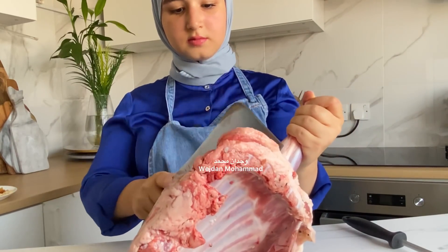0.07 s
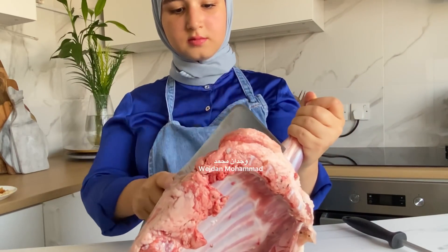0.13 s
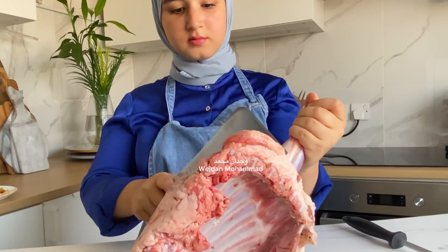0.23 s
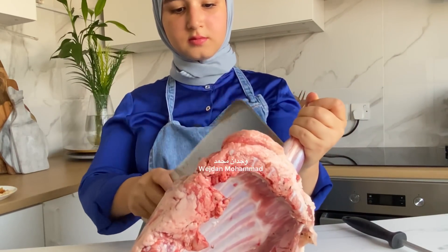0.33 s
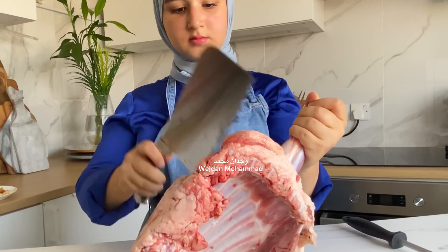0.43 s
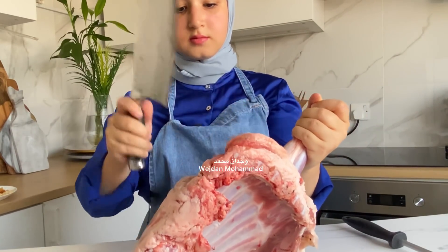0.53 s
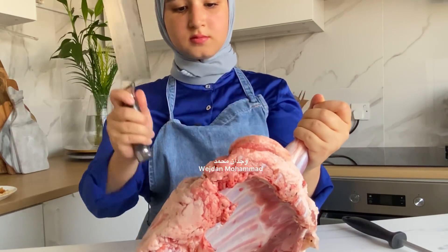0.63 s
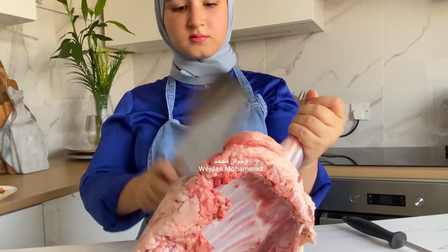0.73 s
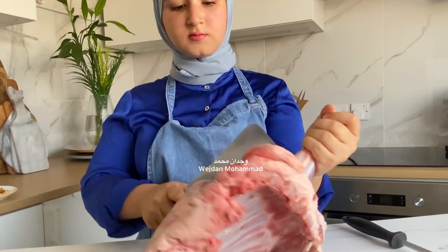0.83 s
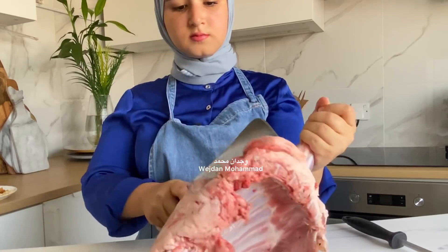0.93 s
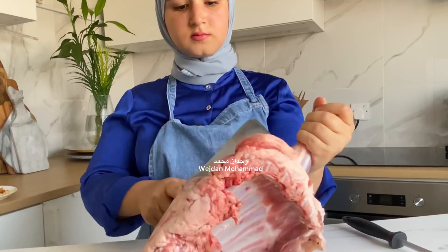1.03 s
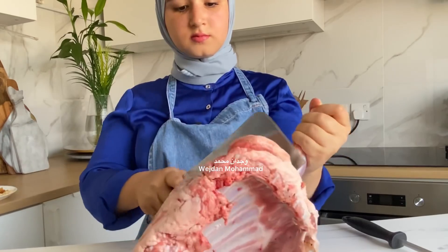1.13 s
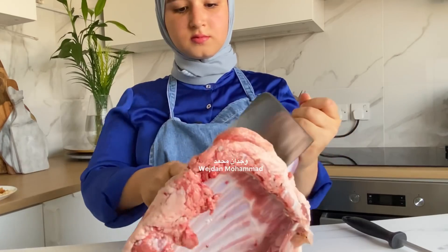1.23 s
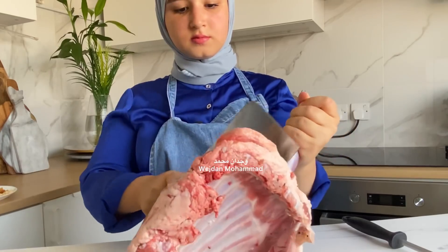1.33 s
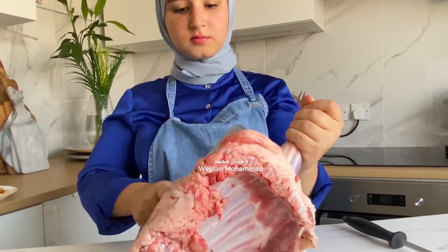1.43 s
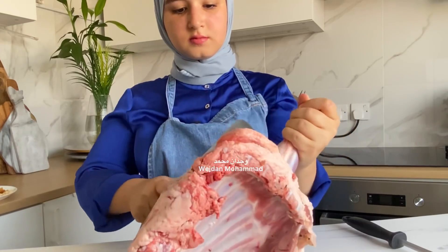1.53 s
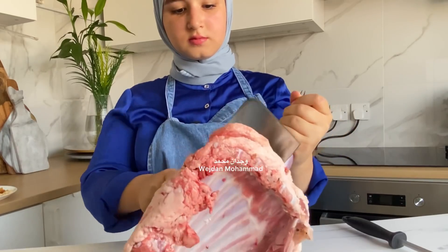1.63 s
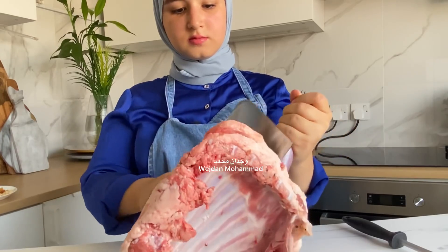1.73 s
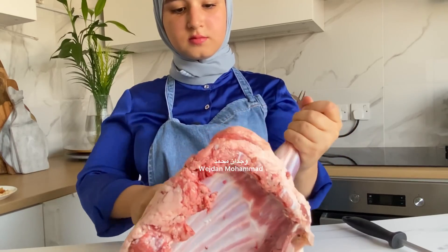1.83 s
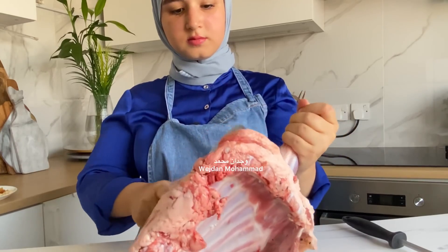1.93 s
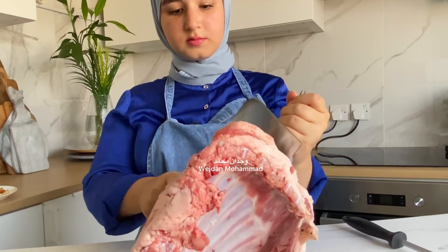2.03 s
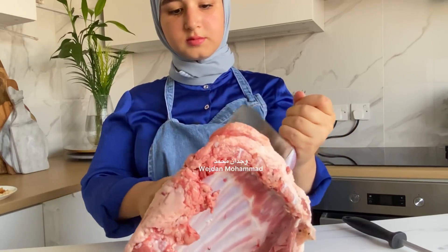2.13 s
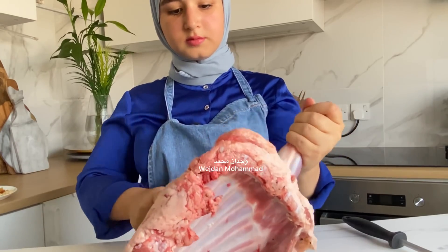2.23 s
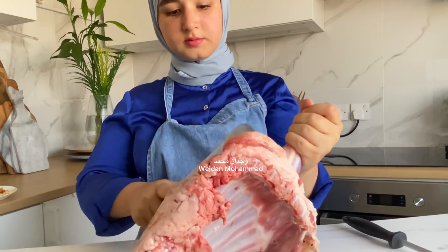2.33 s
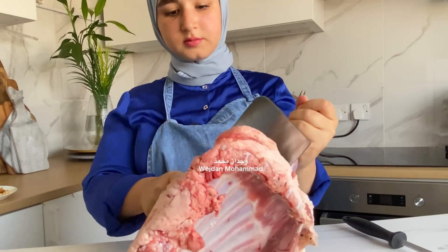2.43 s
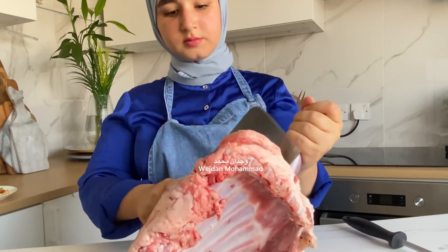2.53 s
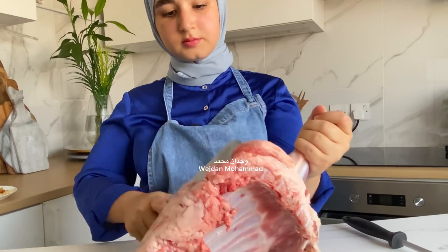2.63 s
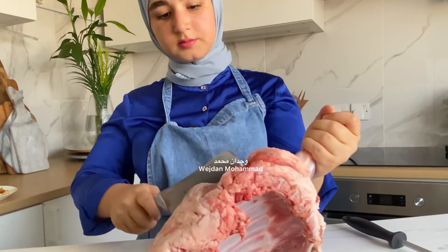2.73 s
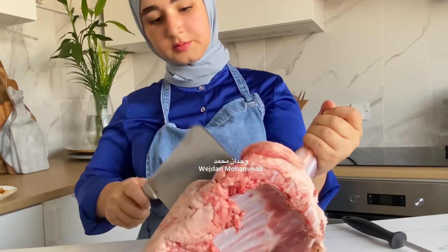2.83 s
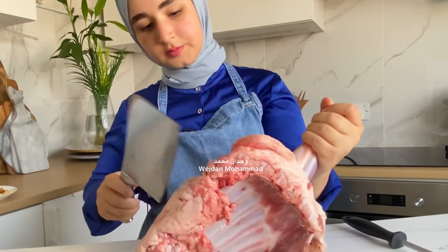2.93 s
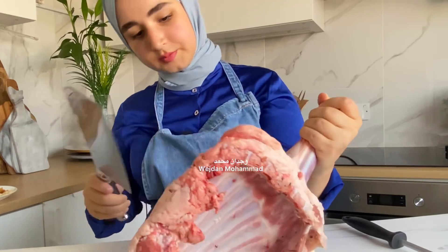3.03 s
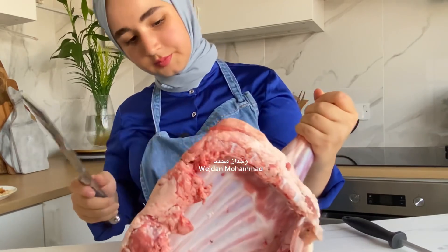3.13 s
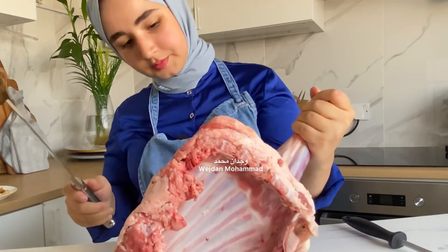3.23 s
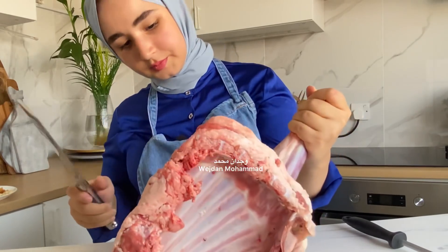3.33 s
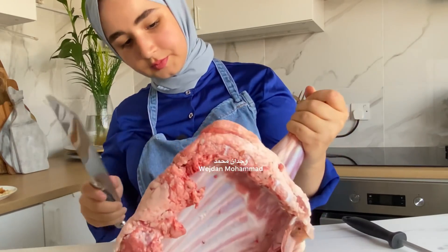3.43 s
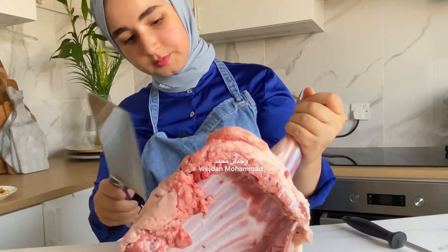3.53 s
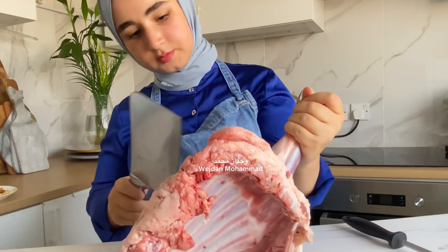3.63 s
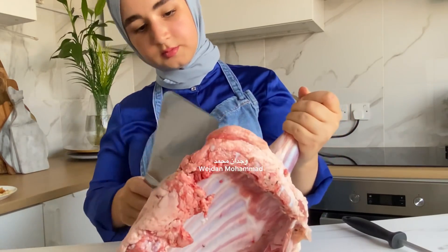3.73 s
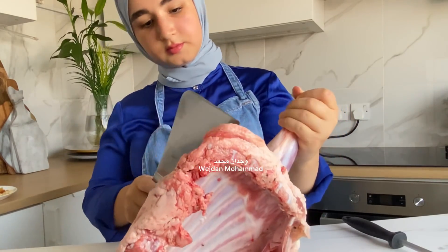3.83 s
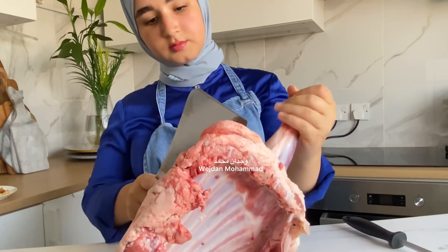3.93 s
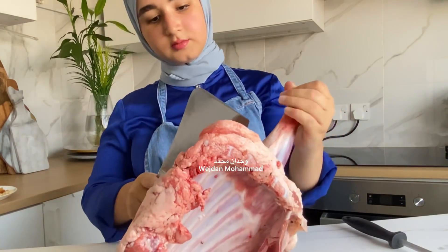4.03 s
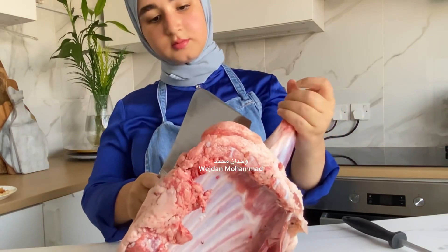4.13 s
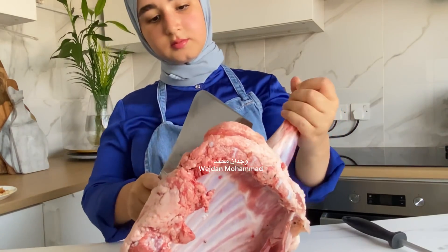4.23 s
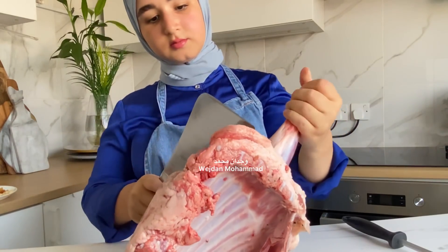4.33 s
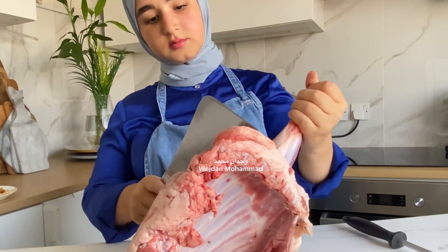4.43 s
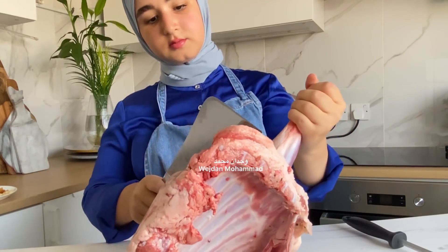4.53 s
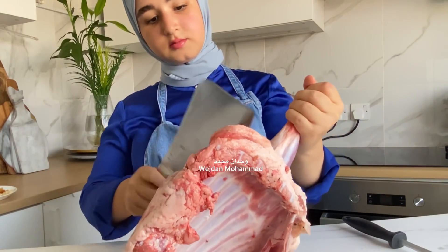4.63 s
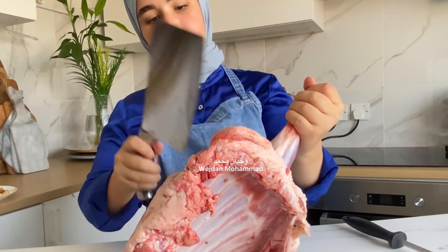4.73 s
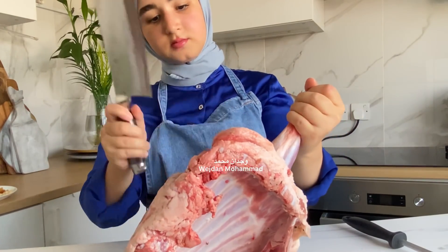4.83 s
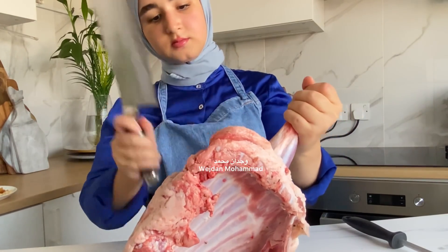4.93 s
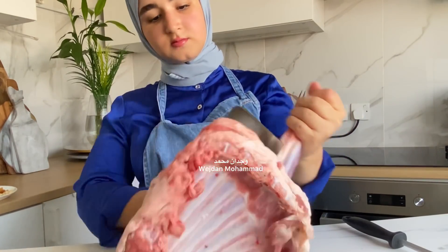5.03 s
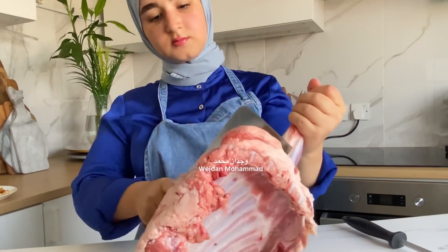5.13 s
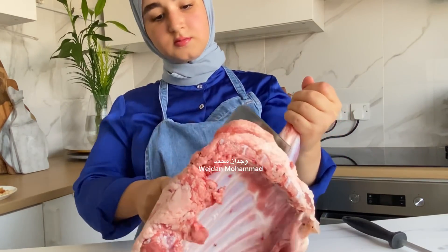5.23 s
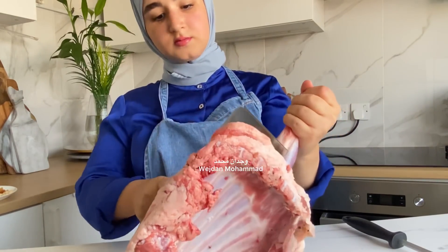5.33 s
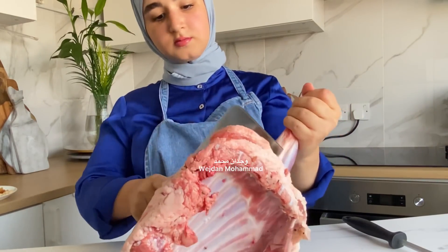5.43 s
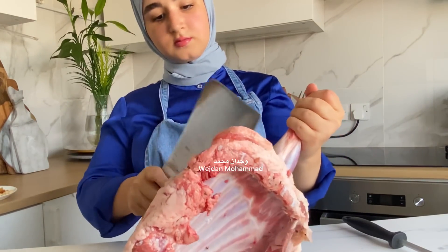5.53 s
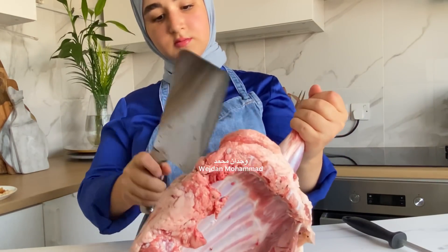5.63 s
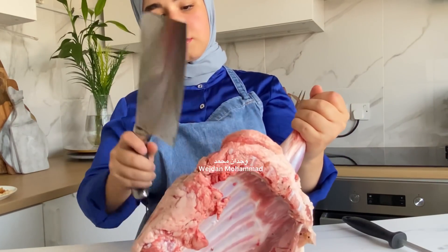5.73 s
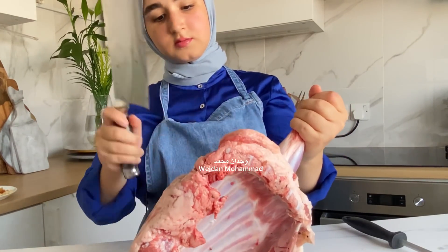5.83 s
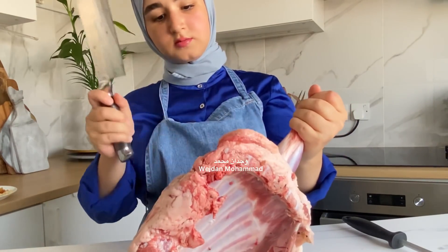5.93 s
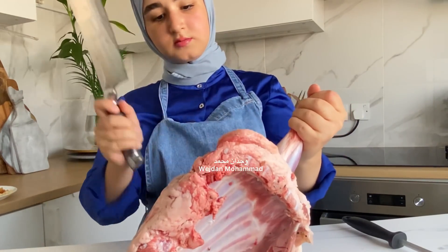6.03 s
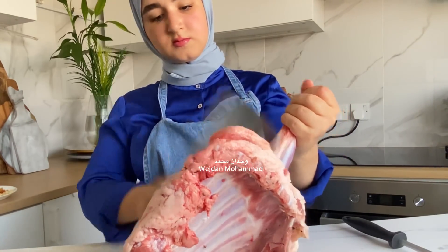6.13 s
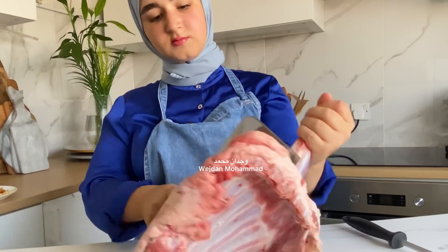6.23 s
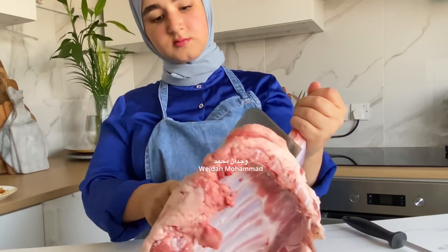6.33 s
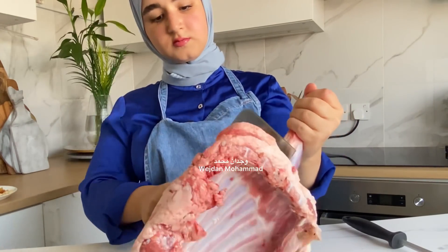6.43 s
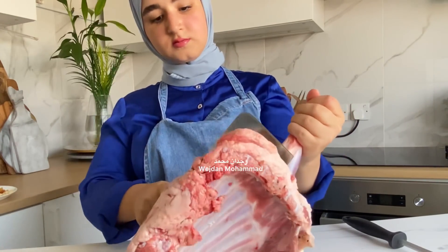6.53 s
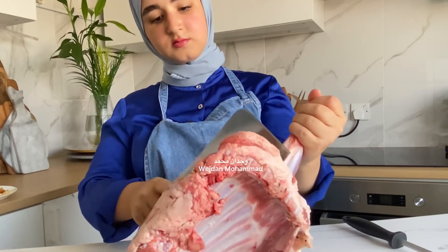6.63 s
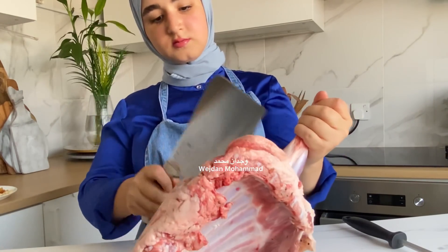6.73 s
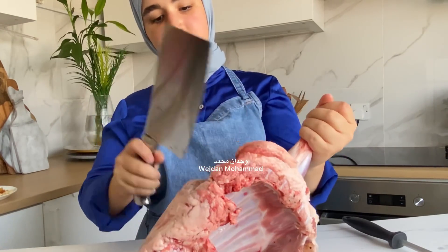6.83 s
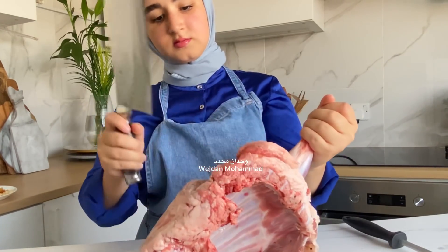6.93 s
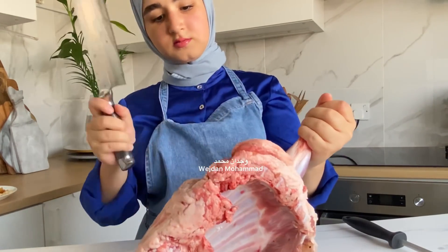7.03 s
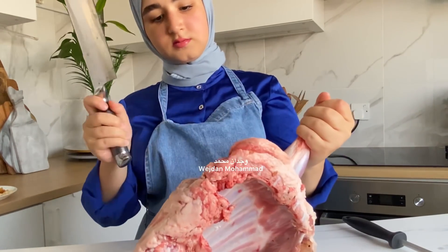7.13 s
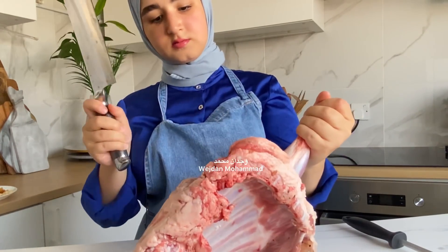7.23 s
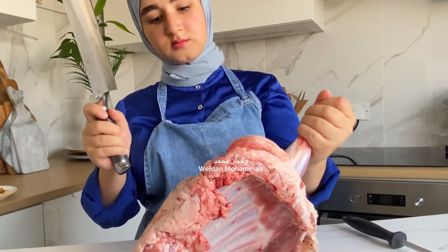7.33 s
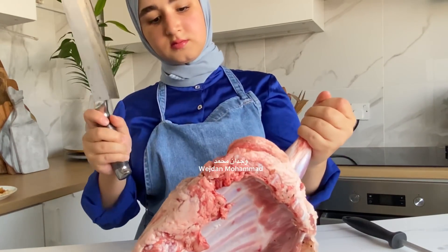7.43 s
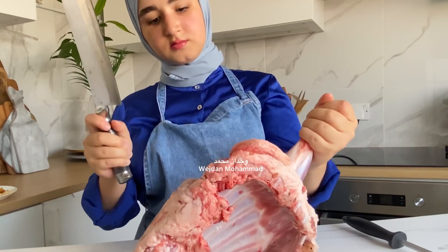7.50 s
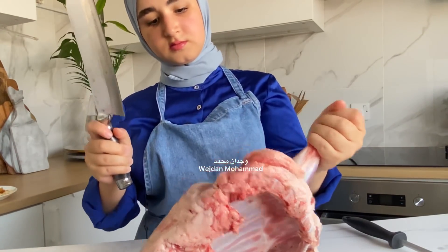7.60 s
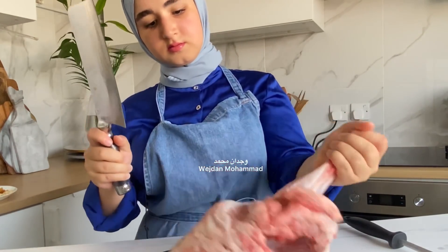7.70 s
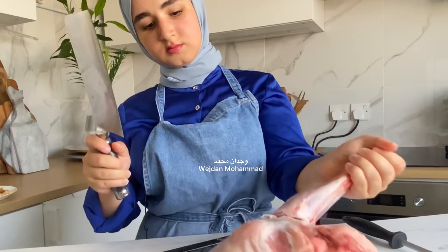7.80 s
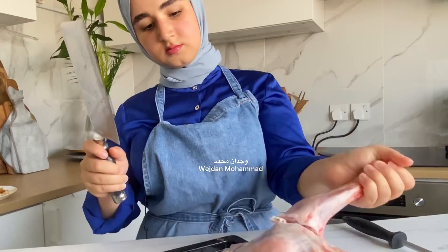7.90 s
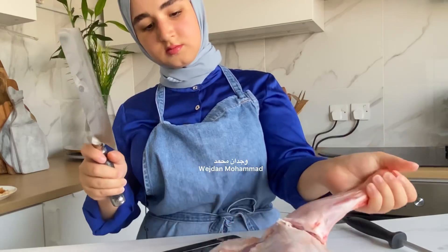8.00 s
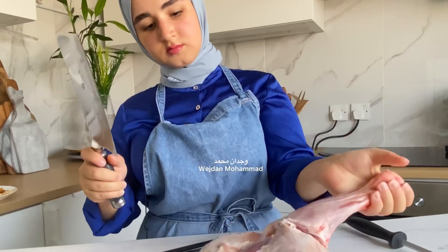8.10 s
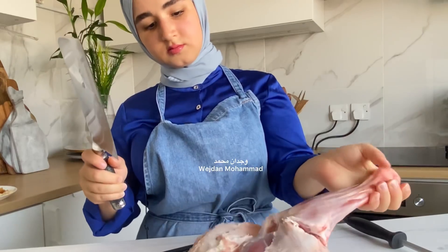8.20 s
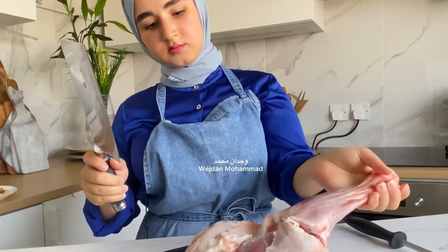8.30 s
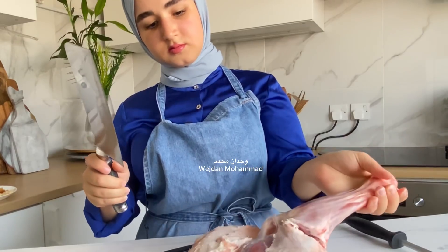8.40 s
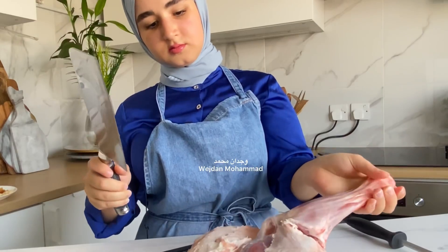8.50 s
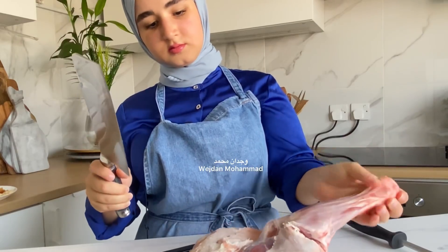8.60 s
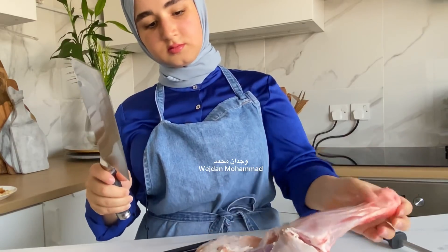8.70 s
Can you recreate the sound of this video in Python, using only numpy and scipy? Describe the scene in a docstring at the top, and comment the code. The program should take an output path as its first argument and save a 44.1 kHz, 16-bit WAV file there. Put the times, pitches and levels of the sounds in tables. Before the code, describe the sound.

In a hard-walled kitchen, a heavy cleaver cracks into meat and bone, bouncing the board and thumping the table. The blade saws faintly to and fro and slides free, then the joint is shifted with soft bumps and wet clicks. Two more chops land, the last with a bright ring of steel, and the meat slides quietly over the board. The blows slightly overload the microphone, and an appliance hums throughout.

```python
"""A heavy cleaver chops into a joint of lamb in a hard-walled kitchen: the edge hisses through flesh,
the bone cracks, the steel rings, the table thumps and the board bounces, overloading the microphone.
The blade saws to and fro and is drawn free, then the sticky joint is shifted with bumps and wet clicks.
Two more chops land, the last with the loudest ring of steel, and the joint slides over the board again.
An appliance hums underneath from start to finish."""
import sys
import numpy as np
from scipy import signal
from scipy.fft import rfft, irfft
from scipy.io import wavfile
from scipy.ndimage import uniform_filter1d

SR = 44100
rng = np.random.default_rng(int(sys.argv[2]) if len(sys.argv) > 2 else 0)


def output_pcm(signal):
    """Save a mono or channel-first signal as 16-bit PCM at the path in sys.argv[1].

    Samples are clipped to [-1, 1] before scaling.
    """
    pcm = np.clip(np.atleast_2d(signal).T, -1, 1) * 32767
    wavfile.write(sys.argv[1], SR, np.round(pcm).astype(np.int16))


N = 386302
TIME = np.arange(N) / SR
AGE = TIME[:SR]   # the second that follows a contact


# Cleaver blows and the mix of their layers: start_s, crack_db, crack_decay_s, tilt_db_per_octave,
# sizzle_db, splinter_db, knock_db, blade_trim_db, thump_db
CHOPS = [(0.767, 0.5, 0.0031, -1, -5, -22.5, -7, -25, -6), (5.0189, 0, 0.0054, -1, 14, -23, -7, -28, -6),
         (6.155, -0.5, 0.0069, .5, 1, -16, -3, -5, -8)]
# Hiss of steel parting flesh: freq_hz, level_db
FLESH_EQ = [(900, -8), (1500, 1), (1900, 3), (2900, -3), (4500, 1), (6400, -0.5), (8700, -8), (10000, -4.5),
            (12400, -11), (13500, -5.5), (16000, -17)]
# Tone of cracking bone: freq_hz, level_db
CRACK_EQ = [(200, 2.5), (570, 5.5), (1000, -1), (1500, -2.5), (1720, 4), (1920, 3.5), (2400, -1),
            (3000, -4.5), (4100, -7.5), (5400, -5), (8000, -15.5), (12000, -20.5), (16000, -31)]
# Dull knock of the bone itself: pitch_hz, level_db, t60_s
BONE_MODES = [(600, -2, .02), (1789, 0.5, .036)]

def bone_chops(flesh_s=0.0037, flesh_db=-21, splinter_s=0.03):
    """The attack: the edge hisses through flesh, then the bone cracks, knocks and splinters."""
    out = np.zeros(N)
    for start_s, crack_db, crack_s, tilt_db, sizzle_db, splinter_db, knock_db, *_ in CHOPS:
        entry = np.sqrt(AGE / flesh_s) * (AGE < flesh_s)
        add(out, start_s - flesh_s, from_db(flesh_db) * entry * noise(FLESH_EQ, SR))
        crack = from_db(crack_db) * np.exp(-(AGE / crack_s) ** 2)
        splinters = from_db(splinter_db) * np.exp(-AGE / splinter_s) * grain(depth_db=8.5, span_s=0.00031)
        fracture = burst(crack + splinters, crack_colour(tilt_db, sizzle_db))
        add(out, start_s, fracture + from_db(knock_db) * struck(BONE_MODES))
    return out


def crack_colour(tilt_db, sizzle_db, pivot_hz=1500, sizzle_hz=10060):
    """A sharper blow tilts the crack towards the treble; a high shelf sets the sizzle on top."""
    hz, db = np.transpose(CRACK_EQ)
    shelf = 1 / (1 + (sizzle_hz / hz) ** 8)
    return np.c_[hz, db + tilt_db * np.log2(hz / pivot_hz) + sizzle_db * shelf]


# Bright ring of the steel: pitch_hz, level_db, t60_s
BLADE_MODES = [(1720, -8.5, .2), (1850, -8.5, .2), (1850, -7, 0.18), (2288, -0.5, .16), (2440, -1.5, .16),
               (3330, -10.5, .22), (4500, -15.5, .22), (5350, 3, .26), (5480, 2, 0.29), (5576, 2.5, 0.219),
               (6290, 11.5, 0.11), (7040, -11, .25), (7550, -8, .15), (10200, -19.5, .12)]

def blade_ring(ring_db=-10):
    """The steel rings after a blow, least when it sticks in the meat; chafing bone roughens the ring."""
    out = np.zeros(N)
    for start_s, *_, trim_db, _ in CHOPS:
        ring = from_db(ring_db + trim_db) * struck(BLADE_MODES)
        add(out, start_s, ring * grain(depth_db=8.5, span_s=0.013))
    return out


# Landings of the board, two to a chop: start_s, clack_db, ring_db
BOUNCES = [(0.7905, 0, -11.5), (0.803, -7.5, -16.5), (5.024, -6.5, -38), (5.043, -5.5, -23),
           (6.160, -13, -28), (6.177, -10, -24)]
# Clack of board on table: freq_hz, level_db
CLACK_EQ = [(100, -8.5), (200, 12), (400, -1.5), (620, 12.5), (950, 0), (1400, -2.5), (2400, -2),
            (4000, -9), (5600, -23.5), (8000, -28.5), (16000, -28)]
# Hollow ring of the board: pitch_hz, level_db, t60_s
BOARD_MODES = [(216, -13.5, .2), (276, -10, 0.31), (321, -9.5, .3), (382.7, -6, .3), (441, -15.5, .25),
               (530, 2, 0.34), (611.4, 1.5, .26), (656, 1.5, .24), (726, -9.5, 0.18), (790, -9.5, 0.22),
               (885, -6.5, .26), (1045, -8.5, .26)]

def board_bounces(clack_s=.004):
    """The body: each landing of the board is a short clack and a hollow ring, returned as two stems."""
    clacks, rings = np.zeros((2, N))
    for start_s, clack_db, ring_db in BOUNCES:
        add(clacks, start_s, burst(from_db(clack_db) * np.exp(-AGE / clack_s), CLACK_EQ))
        add(rings, start_s, from_db(ring_db) * struck(BOARD_MODES))
    return clacks, rings


# Low boom of the table: pitch_hz, level_db, t60_s
TABLE_MODES = [(29, -1.5, 0.2), (81.1, -5, 0.36), (101, -2, 0.1), (122.7, -6, 0.37), (157.4, -10.5, 0.3),
               (205, -3.5, 0.15), (266, -12, .14)]

def table_thumps(lag_s=0.0078):
    """The weight: the meat cushions the blow, so the table is pushed down a moment later."""
    out = np.zeros(N)
    for start_s, *_, thump_db in CHOPS:
        add(out, start_s + lag_s, -from_db(thump_db) * struck(TABLE_MODES))
    return out


# Level ride of the sawing: time_s, level_db
SAW_EFFORT = [(1.39, -50.5), (2.0, -51.5), (2.4, -52.5), (2.6, -47.5), (2.8, -54.5)]
DRAW_OUT = (2.86, 0.41, -56.5)   # the blade is pulled slowly free: start_s, length_s, level_db

def saw_strokes(first_s=1.318, spacing_s=.202, moving_share=0.76, pull_db=-2, count=8):
    """Evenly paced pushes and weaker pulls, each as start_s, length_s, level_db."""
    turn = np.arange(count)
    starts = first_s + spacing_s * turn
    length_s = spacing_s * moving_share
    levels = np.interp(starts + length_s / 2, *np.transpose(SAW_EFFORT)) + pull_db * (turn % 2)
    return [(start_s, length_s, db) for start_s, db in zip(starts, levels)]


def sawing(ring_db=-2, hiss_db=-6, width_hz=160):
    """Tearing fibres hiss and drive the blade's modes, which the meat damps and detunes on each stroke."""
    out = np.zeros(N)
    for start_s, length_s, db in [*saw_strokes(), DRAW_OUT]:
        friction = noise(FLESH_EQ, SR)
        ring = np.zeros(SR)
        for hz, *_ in BLADE_MODES[::2]:   # the buried blade keeps only some of its modes
            detune = rng.normal(1, .04)
            ring += grain(depth_db=1, span_s=0.025) * resonate(friction, hz * detune, width_hz)
        hiss = noise(FLESH_EQ, SR) * grain(depth_db=1.5, span_s=0.0012)
        rasp = from_db(ring_db) * rms_one(ring) + from_db(hiss_db) * hiss
        add(out, start_s, from_db(db) * swell(length_s) * rasp)
    return out


# Soft bumps of hand, handle and meat: start_s, relative_level_db
BUMPS = [(0.516, -20), (1.235, -21), (1.635, -24), (2.391, -21), (4.585, -20), (4.774, -24.5)]
# Wet clicks of gristle: start_s, level_db, peak_hz
GRISTLE_CLICKS = [(1.2353, -42.5, 5060), (3.8199, -43.5, 4800), (3.9521, -48, 7900), (3.997, -46, 12000),
                  (5.437, -39.5, 6230), (6.628, -43.5, 8550)]
# The joint sliding over the board: start_s, length_s, level_db, centre_hz
SLIDES = [(3.498, 0.43, -49.5, 284), (3.804, 0.33, -41.5, 44.6), (7.68, 0.2, -62.5, 6020),
          (7.719, 0.18, -55.5, 2000), (7.682, .35, -53, 260), (8.513, 0.53, -50.5, 1234)]

def handling(bump_hz=260, bump_s=0.0021, click_s=0.0013):
    """Moving the joint makes dull bumps, wet clicks and a rub on the board."""
    out = np.zeros(N)
    # flesh damps a bump within a cycle or two
    bump = np.sin(2 * np.pi * bump_hz * AGE) * AGE / bump_s * np.exp(-AGE / bump_s)
    for start_s, db in BUMPS:
        add(out, start_s - bump_s / 2, from_db(db + 2.5) * bump)
    for start_s, db, hz in GRISTLE_CLICKS:
        click_eq = [(hz / 2, -20), (hz, 0), (2 * hz, -24)]
        add(out, start_s, burst(from_db(db) * np.exp(-AGE / click_s), click_eq, passes=1))
    for start_s, length_s, db, hz in SLIDES:
        rub = rms_one(resonate(rng.standard_normal(SR), hz, width_hz=.5 * hz))
        add(out, start_s, from_db(db) * swell(length_s) * rub * grain(depth_db=3.0, span_s=0.018))
    return out


# Stretches when the meat crackles: start_s, end_s
CRACKLE_CUES = [(1.5, 3.2), (3.4, 4.8), (7.6, 8.4)]

def meat_crackle(snaps_per_s=12, level_db=-57, spread_db=5, snap_s=.0011, centre_hz=12000):
    """Tiny sticky snaps come at random while the meat is handled."""
    handled = sum((TIME > start_s) & (TIME < end_s) for start_s, end_s in CRACKLE_CUES)
    triggers = rng.random(N) < handled * snaps_per_s / SR
    snaps = triggers * from_db(level_db + spread_db * rng.standard_normal(N))
    envelope = signal.lfilter([1], [1, -np.exp(-1 / (snap_s * SR))], snaps + 1e-18)
    return envelope * rms_one(resonate(rng.standard_normal(N), centre_hz, width_hz=6000))


# Steady wash of air: freq_hz, level_db
AIR_EQ = [(40, -4.5), (65, 0), (130, -5), (250, -7.5), (470, -10.5), (700, -13), (1000, -20), (1400, -21),
          (2700, -26.5), (4000, -35.5), (5500, -34), (6900, -37), (7900, -47), (13500, -47.5),
          (16000, -52.5)]
# Deep rumble: freq_hz, level_db
RUMBLE_EQ = [(8, -2.5), (14, -9), (18, 1), (24, -7), (34, -26.5), (60, -36), (150, -75)]
# Resonances in the appliance's air flow: centre_hz, nominal_width_hz, level_db
DUCT_RESONANCES = [(88.23, 6.8, -49.5), (171.6, 13, -52), (400, 4.8, -61.5), (523.5, 35.7, -56.5),
                   (589, 3.3, -58), (915, 84, -60), (2400, 200, -75.5), (3370, 100, -74)]
# Motor tones: pitch_hz, level_db
MOTOR_TONES = [(403.7, -52.5), (866.2, -54), (1098, -65), (1270, -64.5), (1561, -65.5), (2309, -72.5),
               (2331, -66), (2449, -68), (3580, -73.5), (4910, -75)]

def appliance(air_db=-42.5, rumble_db=-36):
    """The bed: air noise and a deep rumble, with resonances of the air flow and steady motor tones."""
    bed = from_db(air_db) * noise(AIR_EQ, N) + from_db(rumble_db) * noise(RUMBLE_EQ, N)
    flow = rng.standard_normal(N)
    for hz, width_hz, db in DUCT_RESONANCES:
        band = resonate(flow, hz, 1.02 * width_hz)
        band = resonate(band, hz, 1.02 * width_hz)   # twice, for steeper skirts
        bed += from_db(db) * rms_one(band)
    for hz, db in MOTOR_TONES:
        bed += from_db(db) * np.sqrt(2) * np.sin(2 * np.pi * (hz * TIME + rng.random()))
    return bed


# Reverb decay of the kitchen: freq_hz, t60_s
KITCHEN_DECAY = [(100, 0.56), (300, 0.45), (700, 0.5), (1500, 0.54), (3000, 0.53), (5500, 0.49),
                 (8000, 0.33), (11000, 0.3), (15000, 0.38)]

def kitchen_reverb(predelay_s=.0045, build_s=0.0017, passes=3):
    """Echoes off hard walls thicken after a short gap, then die away band by band; unit energy."""
    onset = 1 - np.exp(-np.maximum(AGE - predelay_s, 0) / build_s)
    longest_t60 = max(t60 for _, t60 in KITCHEN_DECAY)
    fade = from_db(-60 * AGE / longest_t60)
    echoes = rng.standard_normal(SR)
    for _ in range(passes):   # the strong early echoes favour no pitch
        early = (flatten(echoes * fade, span_hz=35) / fade)[:SR // 5]
        echoes[:len(early)] = rms_one(early)
    hz = np.fft.rfftfreq(SR, 1 / SR)
    centres = np.geomspace(100, 15000, num=12)
    tail = np.zeros(SR)
    for centre, share in zip(centres, np.eye(len(centres))):
        band = irfft(rfft(echoes) * at_hz(np.c_[centres, share], hz), SR)
        tail += onset * band * np.exp(-np.log(1000) * AGE / at_hz(KITCHEN_DECAY, centre))
    return tail / np.sqrt(np.sum(tail ** 2))


def from_db(db):
    """Decibels to gain."""
    return 10 ** (np.asarray(db) / 20)


def rms_one(x):
    """Scale to unit rms."""
    return x / np.sqrt(np.mean(x ** 2) + 1e-20)


def add(track, start_s, sound):
    """Mix a sound into a track at its cue."""
    start = int(np.clip(round(start_s * SR), 0, N - 1))
    track[start:start + len(sound)] += sound[:N - start]


def at_hz(curve, hz):
    """Read a curve on a log-frequency axis."""
    freqs, values = np.transpose(curve)
    return np.interp(np.log(np.maximum(hz, 1)), np.log(freqs), values)


def equalise(x, eq):
    """Colour a sound with an EQ curve."""
    gain = from_db(at_hz(eq, np.fft.rfftfreq(len(x), 1 / SR)))
    return irfft(rfft(x) * gain, len(x))


def noise(eq, size):
    """Coloured noise, rms 1."""
    return rms_one(equalise(rng.standard_normal(size), eq))


def resonate(x, hz, width_hz):
    """Two-pole resonance."""
    r = np.exp(-np.pi * width_hz / SR)
    return signal.lfilter([1 - r, 0, r - 1], [1, -2 * r * np.cos(2 * np.pi * hz / SR), r * r], x)


def struck(modes):
    """Decaying sines; every blow shares its force among the modes a little differently."""
    hz, db, t60 = np.transpose(modes)[:, :, None]
    strength = from_db(db + rng.standard_normal(hz.shape))
    return np.sum(strength * np.sin(2 * np.pi * hz * AGE) * np.exp(-np.log(1000) * AGE / t60), axis=0)


def grain(depth_db, span_s):
    """Uneven gain of many tiny fractures, rms 1."""
    swing = rms_one(uniform_filter1d(rng.standard_normal(SR), max(1, int(span_s * SR))))
    return rms_one(from_db(depth_db * np.clip(swing, -2, 2)))


def swell(length_s):
    """Speed of a stroke that starts and ends at rest."""
    return np.sin(np.pi * np.minimum(AGE / length_s, 1))


def flatten(x, span_hz):
    """Level out the broad peaks and dips of a sound's spectrum; fine detail stays."""
    bins = rfft(x)
    power = uniform_filter1d(np.abs(bins) ** 2, max(1, int(span_hz * len(x) / SR)))
    return irfft(bins / np.sqrt(np.abs(power) + 1e-12), len(x))


def burst(envelope, eq, passes=3):
    """A dense shower of clicks under an envelope, flattened in spectrum and then coloured by an EQ."""
    shape = envelope / envelope.max()
    shower = rng.standard_normal(SR) * shape
    for _ in range(passes):
        shower = flatten(shower, span_hz=15) * shape ** (1 / 4)
    gated = equalise(shower, eq) * (shape > 1e-4)
    return rms_one(gated) * np.sqrt(np.mean(envelope ** 2))


def scene():
    """The mix: each stem has its own send to the kitchen reverb, over the dry appliance bed."""
    clacks, board_rings = board_bounces()
    stems = [(bone_chops() + clacks, 3),   # sound, send_db
             (blade_ring(), -3),
             (board_rings, -7),
             (table_thumps(), -14),
             (sawing() + handling() + meat_crackle(), -7)]
    direct = sum(sound for sound, _ in stems)
    send = sum(from_db(send_db) * sound for sound, send_db in stems)
    reverb = signal.fftconvolve(send, kitchen_reverb())[:N]
    return (direct + reverb + appliance())[None]


def record(dry, cutoff_hz=15900):
    """The blows overload the microphone into soft clipping; a steep low-pass cuts the very top."""
    clipped = dry / (1 + dry ** 8) ** (1 / 8)
    lowpass = signal.ellip(10, .05, 60, cutoff_hz, fs=SR, output="sos")
    return signal.sosfiltfilt(lowpass, clipped)


dry = scene()
out = record(dry)
output_pcm(out)
```